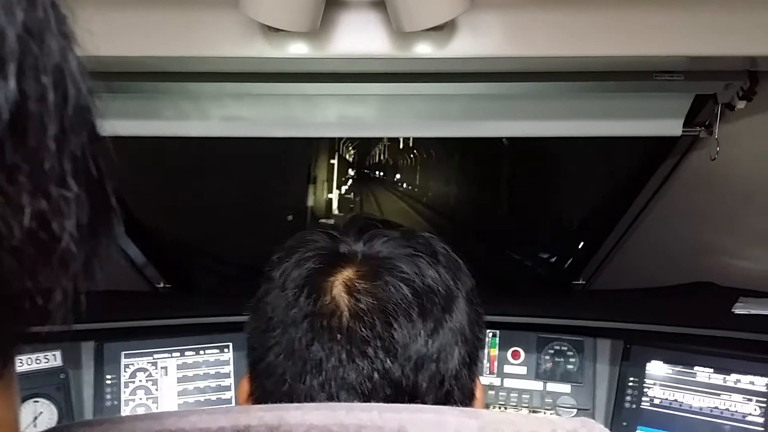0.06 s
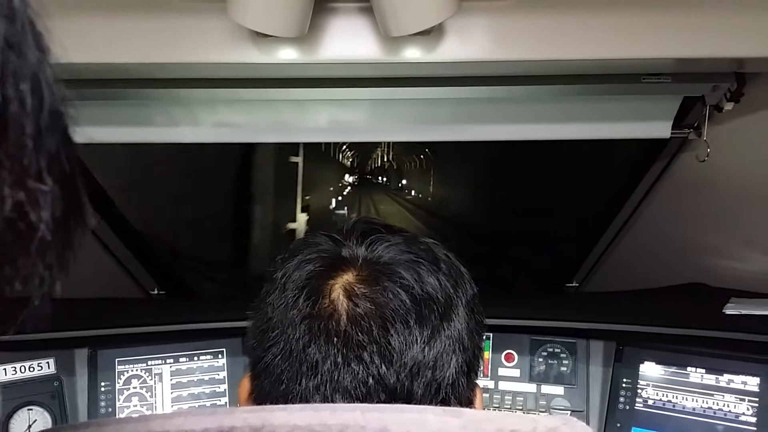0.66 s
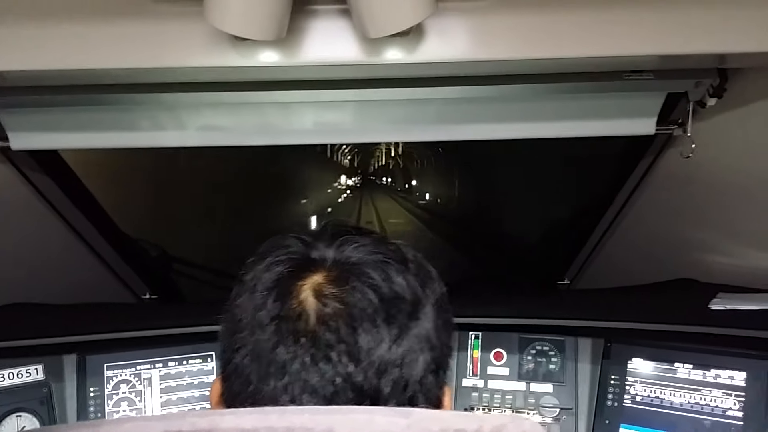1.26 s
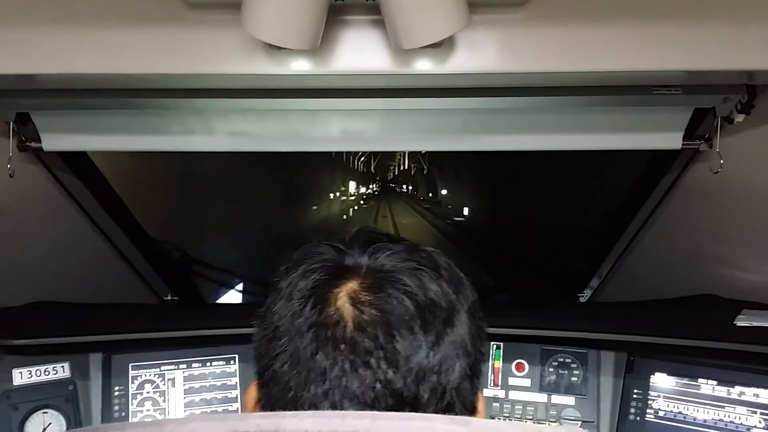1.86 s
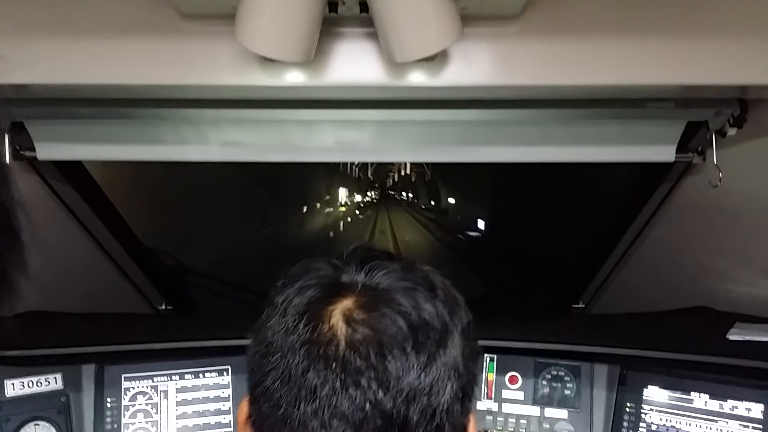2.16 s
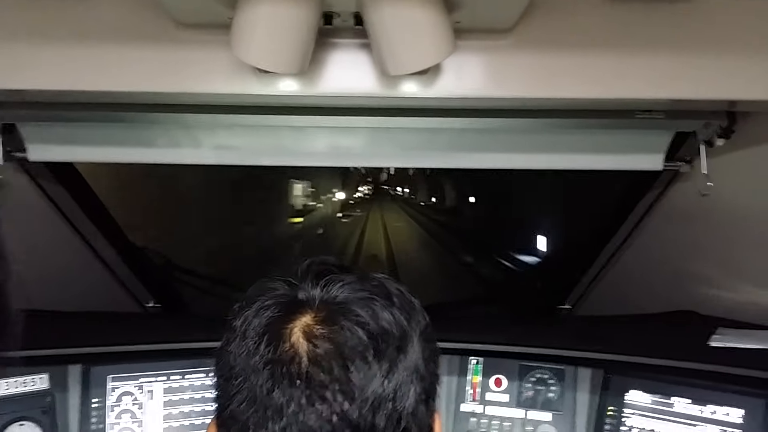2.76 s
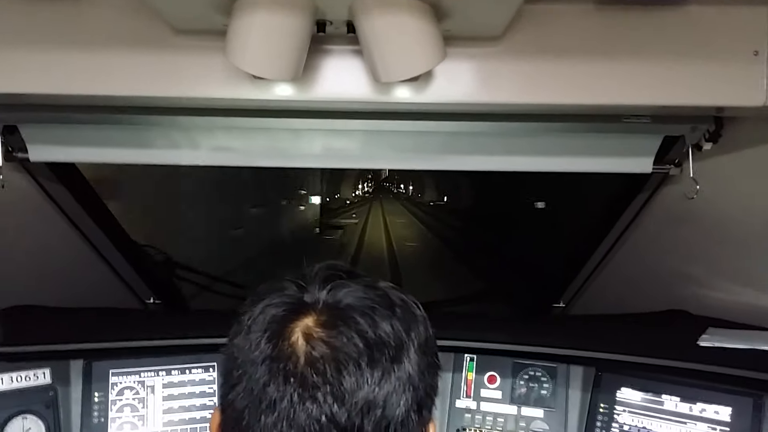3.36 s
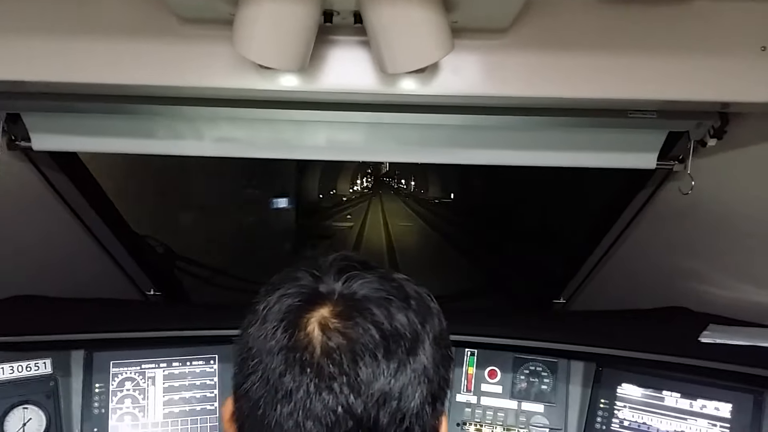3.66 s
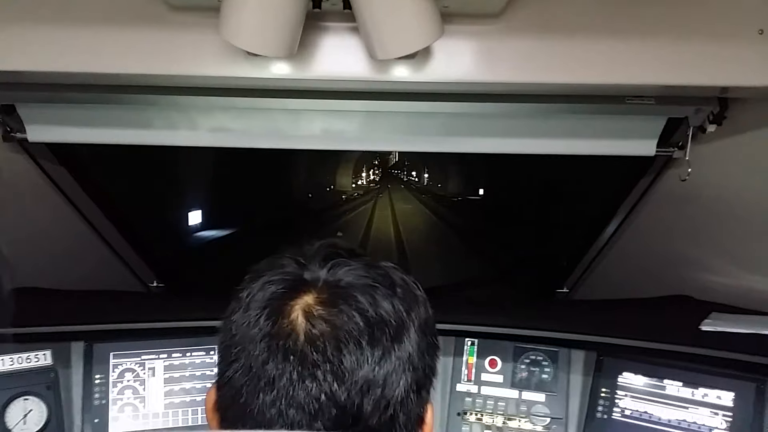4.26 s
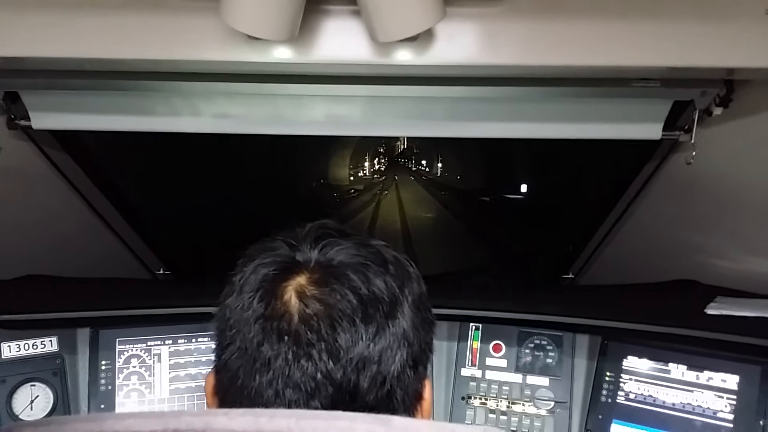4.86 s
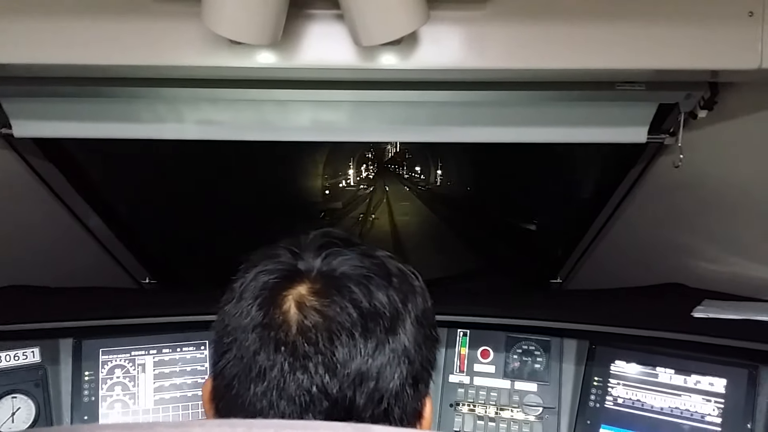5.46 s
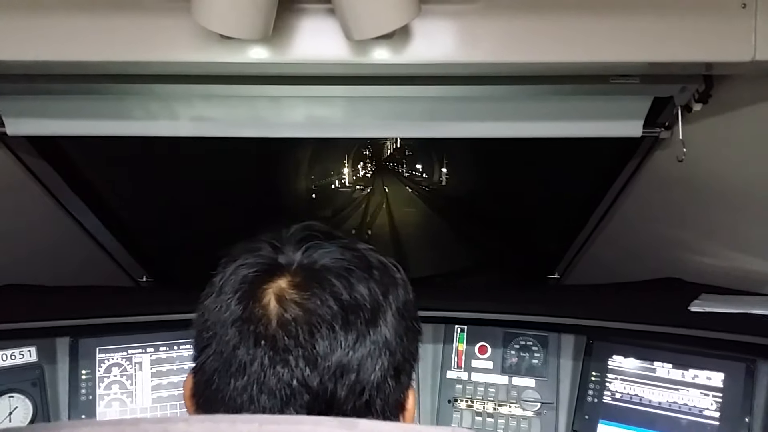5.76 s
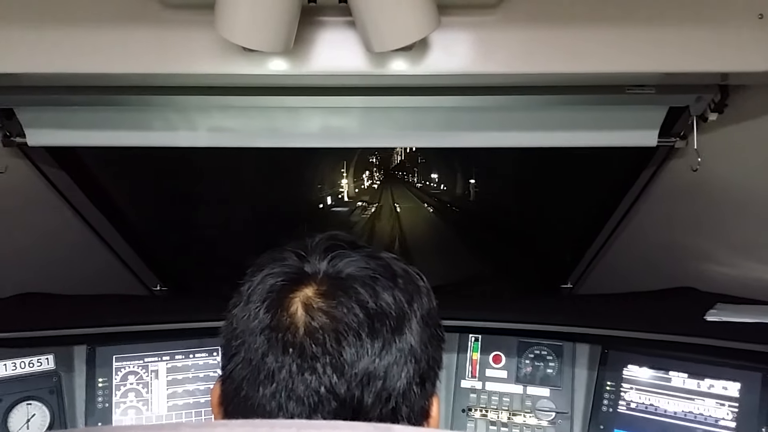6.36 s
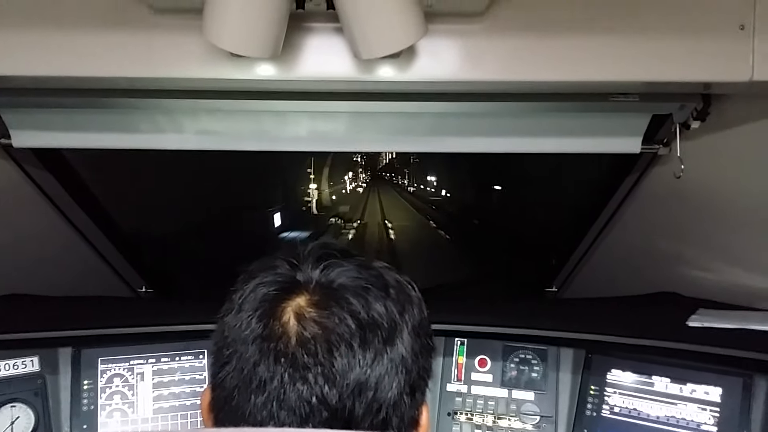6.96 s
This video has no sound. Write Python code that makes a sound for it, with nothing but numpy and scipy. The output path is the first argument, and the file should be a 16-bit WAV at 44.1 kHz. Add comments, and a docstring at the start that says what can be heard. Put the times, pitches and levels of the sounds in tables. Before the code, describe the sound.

A fast train rumbles through a tunnel, heard in the driver's cab; motor whine dies after a puff of air, then the track jolts.

```python
"""A fast train runs through a tunnel at steady speed, heard in the driver's cab.
From the start, rolling and rushing air make the cab boom and roar, the wheels hum on multiples of
their turning rate, a vent hisses on the right and the traction motors whine.
About two seconds in, a valve lets out one short puff of air and the motors die away. Uneven track
jolts the car from then on; near the end the body knocks over it, with faint rustles and ticks."""
import sys
import numpy as np
from scipy import signal
from scipy.fft import rfft, irfft
from scipy.io import wavfile
from scipy.ndimage import uniform_filter1d, minimum_filter1d

SR = 44100
rng = np.random.default_rng(int(sys.argv[2]) if len(sys.argv) > 2 else 0)


def log_audio(samples):
    """Write samples as a 16-bit WAV file to the path given in sys.argv[1]."""
    # one column per channel
    frames = np.atleast_2d(samples).T
    # limit to full scale, then quantise
    limited = np.clip(frames, -1, 1)
    pcm = np.round(limited * 32767).astype(np.int16)
    wavfile.write(sys.argv[1], SR, pcm)


N = 309582
TIME = np.arange(N) / SR
FREQ = np.maximum(np.fft.rfftfreq(N, 1 / SR), 1)
WHEEL_HZ = 12.33  # wheel turns a second; tunes both the wheel hum and the motor whine


def undb(db):
    """Decibels to gain."""
    return 10 ** (np.asarray(db) / 20)


def unit(x):
    """Scale to rms 1."""
    return x / np.sqrt(np.mean(np.abs(x) ** 2))


def pan(left_db, right_db):
    """Gains for the two ears."""
    return undb([[left_db], [right_db]])


def curve(table, column=1):
    """Automation: a column of a time table, joined by straight lines."""
    rows = np.array(table)
    return np.interp(TIME, rows[:, 0], rows[:, column])


def swell(centre_s, width_s):
    """A smooth rise to 1 at centre_s, and fall."""
    return np.exp(-((TIME - centre_s) / width_s) ** 2)


def burst(start_s, rise_s, t60_s):
    """Envelope with a straight attack and an exponential tail."""
    age = TIME - start_s
    return np.clip(age / rise_s, 0, 1) * undb(-60 * np.maximum(age - rise_s, 0) / t60_s)


def waver(rate_hz):
    """Smooth random modulation of rms 1, rolled off above rate_hz."""
    coarse = signal.resample(rng.standard_normal(2048), 8192)
    swing_hz = np.fft.rfftfreq(8192, N / SR / 8192)
    smooth = irfft(rfft(coarse) * np.exp(-(swing_hz / rate_hz) ** 2))
    return np.interp(TIME, np.linspace(0, N / SR, 8192), unit(smooth))


def over_hz(table, column=1):
    """A column of a frequency table, joined on a log axis."""
    rows = np.array(table)
    return np.interp(np.log(FREQ), np.log(rows[:, 0]), rows[:, column])


def colour(table):
    """Left and right EQ gains from a spectrum table."""
    return undb([over_hz(table, 1), over_hz(table, 2)])


def band(low_hz, high_hz, order=4):
    """Gain of a flat band with sloping edges."""
    return 1 / np.sqrt((1 + (low_hz / FREQ) ** (2 * order)) * (1 + (FREQ / high_hz) ** (2 * order)))


def resonance(pitch_hz, half_width_hz, level_db):
    """Gain of one resonant peak."""
    return undb(level_db) / (1 + ((FREQ - pitch_hz) / half_width_hz) ** 2)


# Stereo width of the noise: bass centred, mids wide, top treble centred again: frequency_hz, correlation
STEREO_CORRELATION = [(40, 0.95), (130, 0.94), (340, 0.98), (450, 0.73), (550, 0.57), (750, 0.28),
                      (1000, 0.23), (1400, -0.42), (1900, -0.36), (2600, 0.29), (3600, 0.13),
                      (5900, -0.089), (6600, 0.98), (15000, 0.78)]

def cab_noise(gain):
    """Diffuse stereo noise shaped by a gain spectrum; long waves reach both ears alike."""
    alike = over_hz(STEREO_CORRELATION)
    mid, side = rng.standard_normal((2, len(FREQ))) + 1j * rng.standard_normal((2, len(FREQ)))
    ears = mid * np.sqrt(1 + alike) + np.array([[1], [-1]]) * side * np.sqrt(1 - alike)
    return irfft(ears * gain * np.sqrt(N * SR / 8), N)


def ringing(modes):
    """Noise of rms 1 coloured by a set of resonances."""
    return unit(cab_noise(sum(resonance(*mode) for mode in modes)))


# Tone colour of the vent's air bed: frequency_hz, left_db, right_db
VENT_EQ = [(1310, -71.5, -67.5), (1860, -77.5, -72), (2350, -80.5, -72.5), (2930, -84.5, -69),
           (3370, -81.5, -71), (3520, -83, -70), (4050, -85.5, -77.5), (4980, -87, -84), (6200, -88, -89.5),
           (6980, -92.5, -94), (8200, -95, -94.5), (9000, -101, -101), (15000, -106, -106)]
# Whistling resonances of its grille: pitch_hz, half_width_hz, level_db
GRILLE_MODES = [(2974, 120, -69.5), (3577, 71, -75)]
# Gusts through the grille: centre_s, half_width_s, lift_db
GRILLE_GUSTS = [(.8, .07, 3), (1.4, 0.18, 4.5), (4.45, .09, 4), (5, .1, 4.5), (5.72, .12, 4.5),
                (5.99, .06, -1), (6.25, .07, 4)]

def vent():
    """Cab ventilation hisses; its grille, on the right, whistles unevenly and swells with gusts."""
    hiss = cab_noise(colour(VENT_EQ) * band(1170, 17000, order=8)) * undb(0.58 * waver(20) - 0.35)
    whistle = sum(cab_noise(resonance(*mode)) * undb(1.1 * waver(20)) for mode in GRILLE_MODES)
    creep_db = 0.36 * (TIME - TIME.mean())
    gust_db = sum(db * swell(centre, width) for centre, width, db in GRILLE_GUSTS)
    return hiss + whistle * undb(creep_db + gust_db) * pan(-16, 0)


# Faint rustles: start_s, level_db, low_hz, high_hz
RUSTLES = [(6.516, -47.5, 9000, 12000), (6.764, -45.5, 3000, 11000), (6.832, -47, 2970, 8900)]

def rustles():
    """Brief, grainy wisps of high noise."""
    grain = undb(1.6 * waver(200))
    out = np.zeros((2, N))
    for start, db, low_hz, high_hz in RUSTLES:
        wisp = unit(cab_noise(band(low_hz, high_hz, order=9)))
        out += undb(db) * burst(start, rise_s=0.0052, t60_s=0.085) * grain * wisp
    return out


# Ticks of the cab trim: start_s, level_db, centre_hz, t60_s
TRIM_TICKS = [(6.861, -28, 1550, 0.018), (6.901, -28, 1650, 0.018), (6.92, -30, 1500, 0.03),
              (6.936, -30, 1150, .05), (6.982, -27, 1000, .05)]

def trim_ticks():
    """The trim ticks: each a sharp snap of noise an octave wide."""
    out = np.zeros((2, N))
    for start, db, hz, t60 in TRIM_TICKS:
        snap = unit(cab_noise(band(hz / np.sqrt(2), hz * np.sqrt(2))))
        out += undb(db) * burst(start, rise_s=0.001, t60_s=t60) * snap
    return out


# Noise layers of the puff: delay_s, level_db, rise_s, t60_s, low_hz, high_hz
PUFF_BANDS = [(0, -29, 0.006, 0.2, 3760, 12500), (.003, -28, 0.011, 0.21, 2150, 5700),
              (.009, -30, .009, .35, 750, 2500)]
# Ring of the valve's pipe: pitch_hz, half_width_hz, relative_db
PIPE_MODES = [(1230, 60, 1), (2350, 90, -2), (5340, 150, -8)]

def air_puff(start_s=1.947, open_s=0.038, shut_t60_s=0.12):
    """Air sputters out, dulling as its pressure falls, and rings the pipe; then the valve shuts."""
    sputter = undb(1.6 * waver(200))
    valve = undb(-60 * np.maximum(TIME - start_s - open_s, 0) / shut_t60_s)
    air = np.zeros((2, N))
    for delay, db, rise, t60, low_hz, high_hz in PUFF_BANDS:
        hiss = unit(cab_noise(band(low_hz, high_hz, order=12)))
        air += undb(db) * burst(start_s + delay, rise, t60) * hiss
    pipe = undb(-30.5) * burst(start_s + 0.008, rise_s=0.01, t60_s=0.3) * ringing(PIPE_MODES)
    return valve * (air * sputter + pipe)


# Bouts of panel drone: centre_s, half_width_s, level_db
PANEL_BOUTS = [(2.115, 0.053, 1), (2.48, 0.2, -6.5), (5.8, 0.38, -7.5), (6.9, 0.13, -2)]

def panel():
    """A shaken cab panel drones in bouts on one resonance."""
    drone = cab_noise(resonance(pitch_hz=427.5, half_width_hz=25, level_db=-38))
    return drone * sum(undb(db) * swell(centre, width) for centre, width, db in PANEL_BOUTS)


# Hits on the car body in the heaviest jolts: start_s, level_db
KNOCKS = [(6.02, -19), (6.425, -15), (6.694, -17), (6.752, -17), (6.78, -20), (6.842, -16), (6.888, -16),
          (6.915, -13), (6.984, -18)]
# Ring of the walls and floor: pitch_hz, half_width_hz, relative_db
BODY_MODES = [(128, 20, 3), (174, 25, 2), (255, 30, -3), (315, 20, -5), (428, 30, -4)]

def knocks():
    """Dull blows from the bogie set the walls and floor of the cab ringing briefly."""
    blows = sum(undb(db) * burst(start, rise_s=0.0037, t60_s=0.13) for start, db in KNOCKS)
    return blows * ringing(BODY_MODES)


# Jolts from uneven track: start_s, length_s, sway_lift_db, boom_lift_db, roar_lift_db
JOLTS = [(2.2, 0.43, 3, 6.5, 0.5), (2.72, 0.18, -5, 4, 0), (3.21, 0.12, 2, 5.5, -1.5),
         (3.732, 0.11, 5, 0.5, 1.5), (5.213, 0.083, 6.5, 5, 1), (5.963, 0.1, 7, 8, -0.4),
         (6.38, 0.34, 3.5, 2, 3), (6.68, 0.13, 7.5, 3.5, 4), (6.827, 0.15, 10.5, 3, 4)]

def shaking(layer, drift_db_per_s, attack_s=0.061, release_s=0.063):
    """Gain of one rumble layer: over a slow drift, each jolt builds, holds and settles."""
    level_db = drift_db_per_s * (TIME - TIME.mean())
    for start, length, sway_db, boom_db, roar_db in JOLTS:
        lift_db = {"sway": sway_db, "boom": boom_db, "roar": roar_db}[layer]
        age = TIME - start
        envelope = np.clip(age / attack_s, 0, 1) * np.exp(-np.maximum(age - length, 0) / release_s)
        level_db += lift_db * envelope
    return undb(level_db)


# Tone colour of the car body's low end: frequency_hz, left_db, right_db
BOOM_EQ = [(20, -65.5, -68.5), (29, -58.5, -56.5), (39, -48.5, -46.5), (48.6, -40, -36.5), (55, -41.5, -35),
           (60, -41, -47), (67.3, -38, -35), (104, -39, -34), (130.3, -43.5, -43)]

def body_boom():
    """The body sways in the sub-bass and booms above it; the boom slowly grows in the tunnel."""
    sway = cab_noise(colour(BOOM_EQ) * band(10, 68.6, order=10)) * shaking("sway", drift_db_per_s=-0.5)
    boom = cab_noise(colour(BOOM_EQ) * band(66, 149, order=10)) * shaking("boom", drift_db_per_s=0.5)
    return undb(-2) * sway + undb(-3) * boom


# Tone colour of the rolling and the rushing air: frequency_hz, left_db, right_db
ROAR_EQ = [(175, -43, -41), (187.5, -47.5, -47.5), (229, -43.5, -42.5), (284, -51, -47.5), (318, -45, -42),
           (365, -56.5, -52.5), (449, -49, -50), (503, -57, -54), (634, -55.5, -55.5), (738, -56.5, -52.5),
           (895, -66, -62), (1150, -66.5, -62.5)]

def rolling_roar():
    """The wheels roar in the low mids; above them, air rushes over the nose."""
    roar = cab_noise(colour(ROAR_EQ) * band(143.5, 556, order=10))
    rush = cab_noise(colour(ROAR_EQ) * band(560, 1171, order=10)) * undb(waver(60))
    shaken = shaking("roar", drift_db_per_s=0.06)
    return undb(0.3) * roar * shaken + undb(0.78) * rush * shaken ** 0.35  # the air feels jolts less


# Partials of the uneven wheel treads: wheel_multiple, left_db, right_db
WHEEL_PARTIALS = [(6, -34, -28), (7, -30.5, -32), (13, -32.5, -28.5), (14, -33, -34), (21, -27, -28),
                  (22, -37, -24), (23, -34.5, -31), (25, -27, -27.5), (26, -28, -28), (27, -32, -43),
                  (35, -37.5, -39.5), (36, -46, -44), (37, -32.5, -36), (38, -39, -29.5), (39, -47.5, -32),
                  (43, -50, -35), (46, -58.5, -34.5), (56, -52, -44.5), (59, -54, -44.5)]
# Fader moves for the low and upper partials: time_s, low_db, upper_db
WHEEL_FADERS = [(0, -3.5, -5), (1.95, -4, -10), (2.3, -1.5, 0), (5.1, 1, 2), (5.8, 1.5, 1),
                (7.02, -3, -0.5)]
# Swells and dips of single partials: wheel_multiple, centre_s, half_width_s, lift_db
WHEEL_BEATS = [(21, 0.87, 0.5, 5), (21, 2.1, 0.26, -3), (21, 3.04, .15, -10), (21, 4.25, 0.31, -10),
               (21, 5.72, 0.35, 5), (21, 6.42, 0.11, -10), (22, 2.6, 0.74, -3.5), (22, 5.2, .7, 3),
               (22, 6.75, 0.45, -7), (25, 1.6, .17, 10), (25, 1.9, .1, -9), (25, 2.75, .2, 3.5),
               (25, 4.44, 0.13, 5.5), (25, 5.65, .9, -7), (26, 2.02, .22, -13), (26, 2.72, .14, 2),
               (26, 3.8, 0.22, 5.5), (26, 5.9, .6, -3.5), (26, 6.43, 0.094, 11), (35, 6.85, .25, 8),
               (36, 0.27, .5, 6.5), (37, 2.56, .6, -11.5), (37, 5.15, 0.17, 6), (38, 5.65, 0.25, -9),
               (38, 6.7, .15, 5)]

def wheel_hum():
    """Tread bumps repeat once a turn; partials swell and sink as wheels drift in and out of step."""
    turns = np.cumsum(WHEEL_HZ * (1 + 0.00056 * waver(0.83))) / SR
    low, upper = undb(curve(WHEEL_FADERS, 1)), undb(curve(WHEEL_FADERS, 2))
    out = np.zeros((2, N))
    for multiple, left_db, right_db in WHEEL_PARTIALS:
        fader = low if multiple < 30 else upper
        beat_db = sum(db * swell(centre, width)
                      for partial, centre, width, db in WHEEL_BEATS if partial == multiple)
        phase = 2 * np.pi * (multiple * turns + rng.random()) + 0.37 * waver(2.1)
        flutter = unit(1 + 0.2 * waver(4.4))
        out += pan(left_db, right_db) * fader * undb(beat_db) * np.cos(phase) * flutter
    return np.sqrt(2) * out * undb(-2.5)


def machine_tone(pitch_hz, left_lead_rad, roughness, fade_db=0, flutter_hz=0):
    """A stereo tone of rms 1, roughened by the shaking bogie, fading as cab reflections shift."""
    cycles = np.cumsum(pitch_hz + flutter_hz * waver(12)) / SR
    phase = 2 * np.pi * (cycles + rng.random()) + 0.15 * waver(1.7)
    shake = 1 + roughness * (waver(53) + 1j * waver(110))
    ears = [np.real(shake * np.exp(1j * (phase + lead))) * undb(fade_db * waver(4.3))
            for lead in (left_lead_rad, 0)]
    return unit(np.array(ears))


def run_down(off_s, fall_db_per_s=83):
    """Gain of a traction tone: full until its power is cut, then dying away."""
    return undb(-fall_db_per_s * np.maximum(TIME - off_s, 0))


def inverter():
    """The inverter's thin whistle swells once before it cuts out."""
    whistle = machine_tone(2052, left_lead_rad=-1.7, roughness=0.46, fade_db=0.5)
    level_db = -53 + 6 * swell(centre_s=1.2, width_s=0.3)
    return pan(-4, 2) * whistle * undb(level_db) * run_down(off_s=1.9)


def equipment_hum():
    """The traction equipment hums low while under power."""
    hum = machine_tone(323.6, left_lead_rad=0.091, roughness=0.05, fade_db=-1.5)
    return undb(-26.5) * hum * run_down(off_s=1.7)


# Fader moves for the gear tone: time_s, level_db
GEAR_FADER = [(0, -50), (.3, -45), (.65, -51), (.8, -39), (.95, -53), (1.15, -50), (1.3, -37.5),
              (1.7, -33.5), (1.95, -52), (2.06, -41), (2.25, -37.5)]

def gears():
    """Meshing gear teeth sing one rough note that comes and goes."""
    mesh = machine_tone(973, left_lead_rad=1.0, roughness=0.3)
    return pan(-6, 1) * mesh * undb(curve(GEAR_FADER)) * run_down(off_s=2.3)


# Motor partials, played on the nearest whole multiple of the wheel rate:
# wheel_multiple, left_db, right_db, left_lead_rad, roughness, flutter_hz
MOTOR_PARTIALS = [(36, -47.5, -41, 0.8, 0.2, 1), (55, -33.5, -42.5, -0.26, 0.4, 6),
                  (57, -39, -44.5, -1, 0.4, 7), (59, -28.5, -21.5, -1.26, 0.11, 1.28),
                  (63.1, -36, -38, 0.64, 0.2, 4.97), (105.3, -61.5, -55.5, 0.7, 0.1, 2),
                  (117.9, -53, -44.5, 1.4, 0.34, 2.5)]
# Traction effort, riding the level of the whine: time_s, relative_db
MOTOR_EFFORT = [(0, -25), (.33, -23.5), (.43, -27.5), (.5, -24), (.63, -25.5), (.76, -34), (.88, -22.5),
                (.95, -29.5), (1.04, -25), (1.13, -28), (1.21, -33.5), (1.5, -28.5), (1.63, -30.5),
                (1.88, -26), (1.96, -28), (2.01, -23), (2.06, -27), (2.1, -42), (2.16, -38), (2.26, -28.5),
                (2.4, -39), (2.45, -55)]

def motors():
    """Motors geared to the wheels whine and ring their housing, louder as they pull harder."""
    effort = undb(curve(MOTOR_EFFORT)) * run_down(off_s=2.4)
    effort /= np.sqrt(np.mean(effort[TIME < 2] ** 2))
    whine = np.zeros((2, N))
    for multiple, left_db, right_db, lead, roughness, flutter in MOTOR_PARTIALS:
        tone = machine_tone(round(multiple) * WHEEL_HZ, lead, roughness, fade_db=0.4, flutter_hz=flutter)
        whine += pan(left_db, right_db) * tone
    housing = cab_noise(resonance(pitch_hz=1396, half_width_hz=27, level_db=-60.5))
    return undb(1.5) * effort * (whine + housing)


def scene():
    """The cab mix, with the small details a little to the right."""
    running = body_boom() + rolling_roar() + panel() + knocks() + vent() + wheel_hum()
    traction = motors() + gears() + inverter() + equipment_hum()
    details = air_puff() + rustles() + trim_ticks()
    return running + traction + details * pan(-3, 1.2)


def record(dry):
    """A smooth limiter ducks peaks over the ceiling; the ends fade and the top is cut."""
    ceiling, window_samples, fade_s, top_hz = 0.9, 881, 0.004, 15400
    headroom = ceiling / np.maximum(np.abs(dry).max(axis=0), ceiling)
    ducking = uniform_filter1d(minimum_filter1d(headroom, window_samples), window_samples)
    fades = np.minimum(np.minimum(TIME, TIME[-1] - TIME) / fade_s, 1)
    lowpass = signal.ellip(10, 0.1, 80, top_hz, fs=SR, output="sos")
    return signal.sosfilt(lowpass, dry * ducking * fades)


dry = scene()
out = record(dry)
log_audio(out)
```